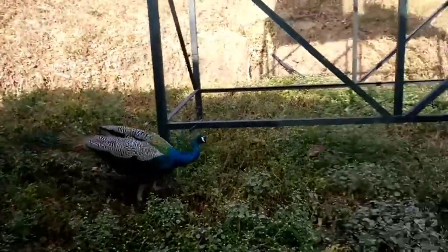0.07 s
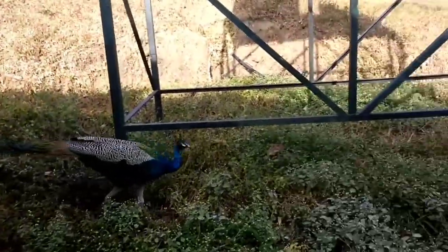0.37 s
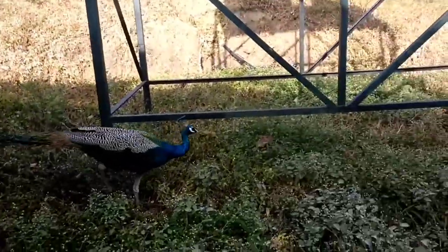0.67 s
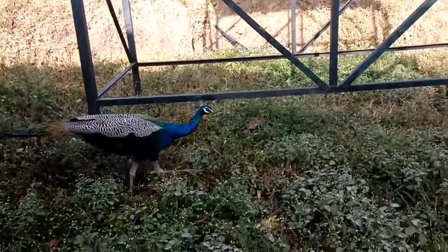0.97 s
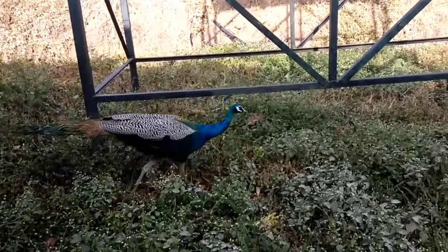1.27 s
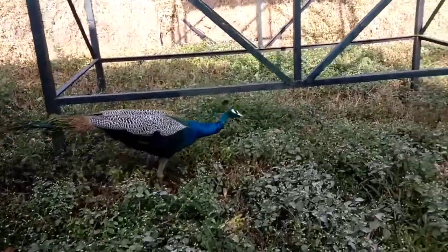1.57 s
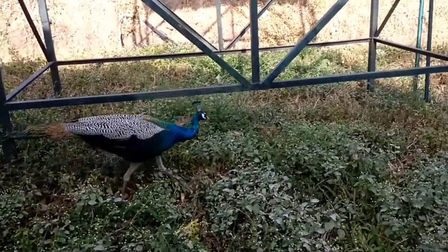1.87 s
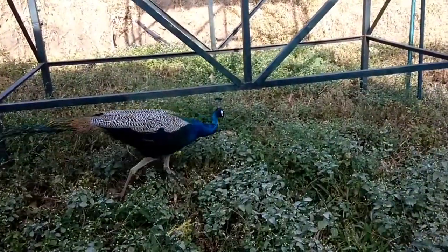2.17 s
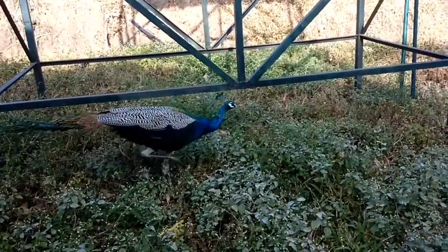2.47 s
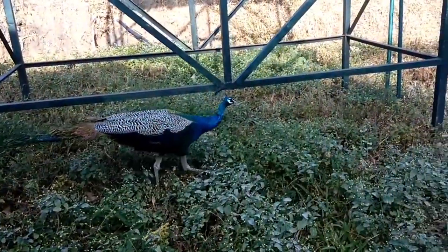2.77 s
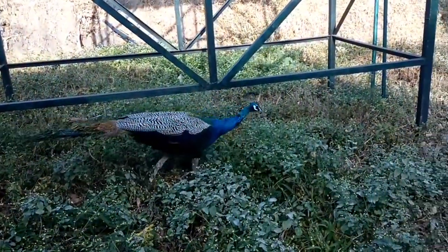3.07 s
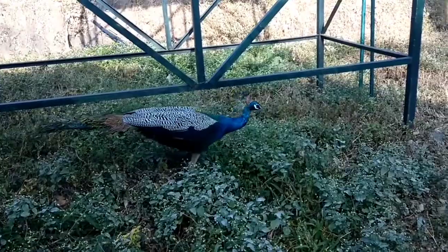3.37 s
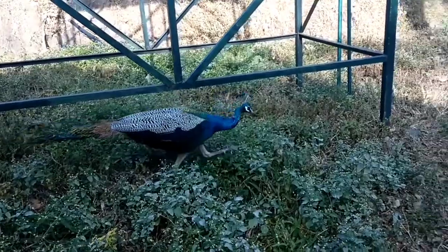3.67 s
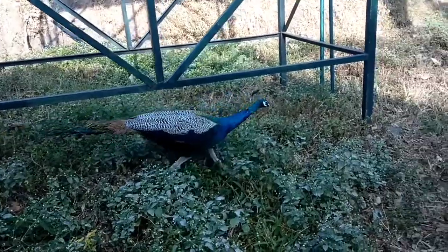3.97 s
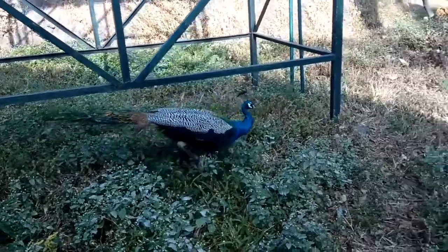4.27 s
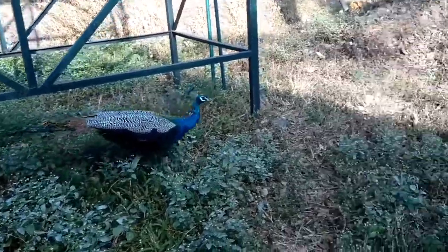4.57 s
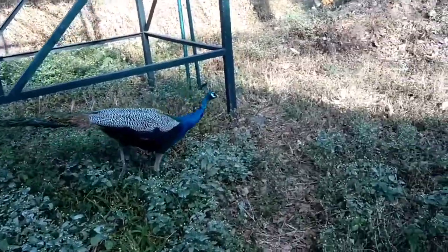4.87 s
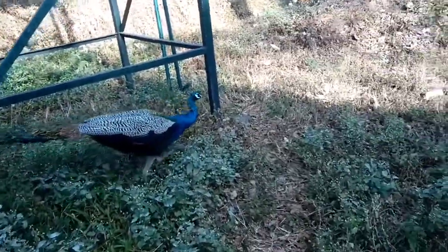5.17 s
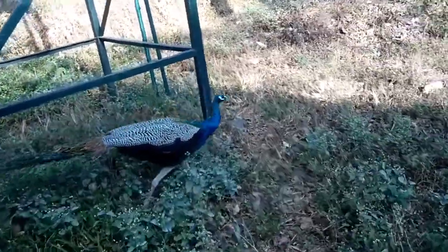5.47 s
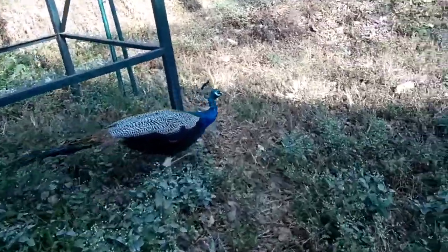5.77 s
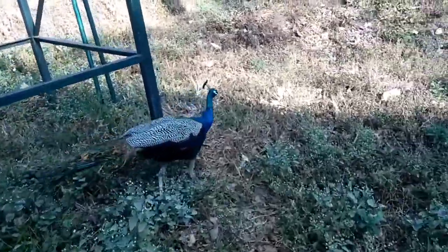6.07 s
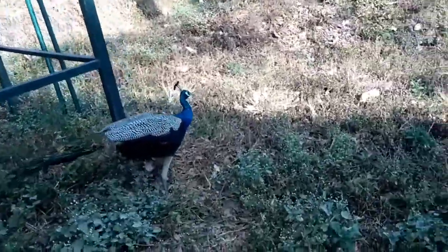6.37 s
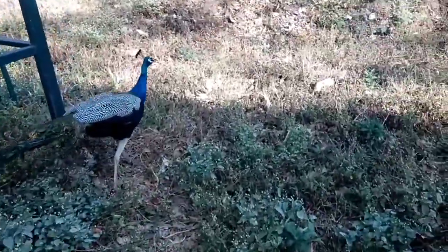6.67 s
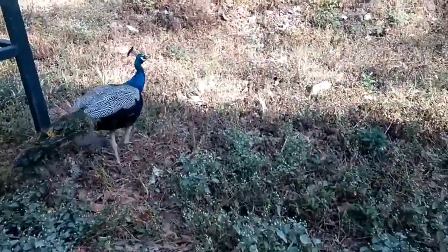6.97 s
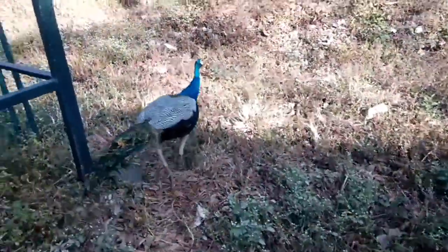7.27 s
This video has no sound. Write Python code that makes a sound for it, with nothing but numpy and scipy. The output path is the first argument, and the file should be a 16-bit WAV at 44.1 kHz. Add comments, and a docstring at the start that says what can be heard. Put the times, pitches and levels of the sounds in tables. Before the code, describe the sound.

A quiet outdoor background of distant rumble, faint hum and high insect hiss runs underneath. A soft low thump sounds right at the start, and far birds chip through the first second. From 1.2 to 2.5 seconds a small songbird sings a clear, high trill of nine quick syllables, echoing lightly among trees. Three faint, lower whistles come from the left between 1.6 and 2.9 seconds. Most of the background fades at 2.5 and snaps back at 2.8. The songbird swells into a buzz near 3.2 seconds, running straight into six slurred whistles that end around 4.4. A second soft thump comes at 4.8 amid more distant chips, and dry leaves crackle briefly around 5.5. The same trill returns from 5.9 to 7.1 seconds. The background fades again, then returns abruptly with one faint chip at about 7.5.

```python
"""Among trees, a small songbird sings a quick trill and a swelling buzz that runs into slurred whistles; then
the same stretch of trill plays again exactly. Its notes are gliding pure tones, its buzz a frequency-modulated
one; nearby surfaces reflect them and the trees scatter them. Fainter birds call over a distant rumble, a hum
and a hiss of insects; dry leaves crackle and two soft thumps sound. After each trill most of the background
fades away and comes back abruptly."""
import sys
import numpy as np
from scipy import signal
from scipy.fft import rfft, irfft, next_fast_len
from scipy.io import wavfile
from scipy.ndimage import uniform_filter1d, map_coordinates

SR = 44100
rng = np.random.default_rng(int(sys.argv[2]) if len(sys.argv) > 2 else 0)


def to_wav(s):
    """Save 16-bit WAV."""
    ch = np.atleast_2d(s).T  # columns
    pcm = np.round(np.clip(ch, -1, 1) * 32767)  # PCM
    wavfile.write(sys.argv[1], SR, pcm.astype(np.int16))


N = 332073
TIME = np.arange(N) / SR

# a short falling chip; every note shape is (length [s], pitches [Hz], attack [s], hold [s], drop [dB])
CHIP = dict(length_s=.0202, pitch_hz=[4550, 4370, 4123, 3900], attack_s=0.0048, hold_s=.0032, drop_db=10)


def trill(sweep_after_s=0.018, tail_after_s=0.0385, hook_growth=1.38):
    """Frequency glides in quick succession: each syllable is a hook, an upsweep, a tail and a pip."""
    # note shapes (length [s], pitches [Hz], attack [s], hold [s], drop [dB])
    hook = dict(length_s=0.019, pitch_hz=[3410, 3523, 3658, 3495, 2950],
            attack_s=0.012, hold_s=0.0035, drop_db=15.5)
    upsweep = dict(length_s=0.023, pitch_hz=[4120, 4326, 4524, 4770, 5514, 6000],
               attack_s=0.013, hold_s=0.0023, drop_db=25)
    sagging_tail = dict(length_s=0.0362, pitch_hz=[4460, 4170, 4070, 4001, 3984, 4110],
                    attack_s=0.0055, hold_s=0.0063, drop_db=11.5)
    high_pip = dict(length_s=0.014, pitch_hz=[7100, 7080, 7105, 6980, 6550],
                attack_s=0.0067, hold_s=0.0043, drop_db=10)
    # syllables (time [s], upsweep level [dB], pip level [dB])
    syllables = [(1.2363, -11.5, -20.5), (1.3746, -5, -19), (1.5162, -3.5, -18), (1.6551, -3, -21),
                 (1.796, -3, -22.5), (1.9385, -3, -18), (2.0807, -3.7, -18.5), (2.2243, -4.5, -24.5),
                 (2.3748, -6, -40)]
    s, db, pip_db = np.transpose(syllables)
    hooks = notes(hook, s, -5.5 + hook_growth * db)  # the hook gains most from effort
    sweeps = notes(upsweep, s + sweep_after_s, db)
    tails = notes(sagging_tail, s + tail_after_s, db - 2.5)
    period_s = np.append(np.diff(s), np.diff(s)[-1])
    pips = notes(high_pip, s + 0.675 * period_s, pip_db)
    return hooks + sweeps + tails + pips


def buzz(pitch_hz=4704, push_hz=93, flutter_hz=167.5, swing_hz=200):
    """Fast, uneven frequency and amplitude modulation roughens a tone that rises a little as it swells."""
    peak_s, swell_s, swell_db = 3.244, 0.34, 46.5
    stop_s, release_db_per_s = 3.342, 979
    effort_db = -swell_db * (np.minimum(TIME - peak_s, 0) / swell_s) ** 2
    db = -7.5 + effort_db - release_db_per_s * np.maximum(TIME - stop_s, 0)
    carrier_hz = pitch_hz + push_hz * amp(effort_db) ** 2
    flutter = oscillator(flutter_hz * (1 + 0.033 * wobble(120)))
    rasp_hz = 40 * wobble(250)
    tone = oscillator(carrier_hz + swing_hz * flutter + rasp_hz)
    return amp(db + 0.3 * wobble(150)) * (1 + 0.12 * flutter) * tone


def slurs(dive_after_s=0.0211):
    """Pitch and amplitude glide together: after a peep, a whistle dives, nearly vanishes and climbs."""
    # note shapes (length [s], pitches [Hz], attack [s], hold [s], drop [dB])
    peep = dict(length_s=0.016, pitch_hz=[5520, 5660, 5825, 6130],
            attack_s=0.011, hold_s=0.0023, drop_db=19)
    dive = dict(length_s=.0305, pitch_hz=[4190, 3573, 3323, 3187, 3020, 2780],
            attack_s=0.0035, hold_s=0.0046, drop_db=25)
    trough = dict(length_s=0.045, pitch_hz=[2800, 2616, 2422, 2500, 2960],
              attack_s=.0032, hold_s=0.037, drop_db=4.5)
    climb = dict(length_s=0.052, pitch_hz=[3103, 3546, 3855, 4086, 4706, 5089.4],
             attack_s=0.024, hold_s=0.019, drop_db=10)
    # syllables (time [s], climb time [s], peep level [dB], dive level [dB], climb level [dB],
    # dive pitch [ratio])
    syllables = [(3.404, 3.476, -17.5, -26, -7, 0.84), (3.556, 3.6513, -12.5, -9.5, -5, 0.99),
                 (3.737, 3.829, -11.5, -7, -6, 0.99), (3.9142, 4.007, -16, -9, -6.5, 1),
                 (4.097, 4.1887, -15, -8.5, -4.5, 1), (4.282, 4.372, -12, -8.5, -7.5, 0.99)]
    s, climb_s, peep_db, dive_db, climb_db, dive_ratio = np.transpose(syllables)
    dives = notes(dive, s + dive_after_s, dive_db, dive_ratio)
    troughs = notes(trough, climb_s - trough["length_s"], levels_db=-36)
    return notes(peep, s, peep_db) + dives + troughs + notes(climb, climb_s, climb_db)


def notes(shape, times, levels_db, ratios=1):
    """Superposition of one note shape sung at each time, level and pitch ratio."""
    out = np.zeros(N)
    for s, db, ratio in np.broadcast(times, levels_db, ratios):
        add(out, s, amp(db) * note(ratio=ratio, **shape))
    return out


def note(length_s, pitch_hz, attack_s, hold_s, drop_db, ratio):
    """An attack-hold-release envelope shapes a glide through pitches evenly spaced in time."""
    t = np.arange(0, length_s, 1 / SR)
    knots = np.linspace(0, length_s, len(pitch_hz))
    pitch_chance, level_chance = rng.standard_normal((2, len(knots)))
    pitch = ratio * np.interp(t, knots, pitch_hz * (1 + 0.005 * pitch_chance))
    attack = np.minimum(t / attack_s, 1) ** 0.86
    release = np.clip((t - attack_s - hold_s) / max(length_s - attack_s - hold_s, 1 / SR), 0, 1)
    dip_db = 4 * np.exp(-((pitch - 3955) / 92) ** 2)  # the note thins as it passes this pitch
    db = 0.81 * np.interp(t, knots, level_chance) - drop_db * release - dip_db
    return whistle(pitch, attack * amp(db))


def whistle(pitch, gain):
    """A pure tone; smoothed pitch and tapered ends keep its spectrum narrow."""
    taper = signal.windows.tukey(len(pitch), 120 / len(pitch))
    return taper * gain * oscillator(uniform_filter1d(pitch, size=90, mode="nearest"))


def echoes(x, wet_db, t60):
    """Convolution with the direct path, near reflections and a diffuse tail scattered by the trees."""
    # reflections from nearby surfaces (delay [ms], level [dB])
    reflections = [(3.1, -24), (9.6, -14), (12.6, -15.5), (18.4, -20), (21.2, -28.4)]
    t = np.arange(round(0.8 * SR)) / SR
    build_up = 1 - np.exp(-t / 0.014)
    tail = rng.standard_normal(len(t)) * amp(-60 * t / t60) * build_up
    response = amp(wet_db) * tail / np.linalg.norm(tail)
    response[0] = 1
    for ms, db in reflections:
        response[round(ms * SR / 1000)] += amp(db)
    return signal.fftconvolve(x, response)[:N]


def far_birds(chip_gap_s=0.031):
    """Distance weakens the direct sound of chips and whistles against their reverberation."""
    # double and single chips (time [s], level [dB])
    double_chips = [(-.006, -31), (0.387, -34.5), (0.572, -31.5), (0.817, -36), (1.059, -32.5)]
    lone_chips = [(2.828, -31), (7.447, -30.5)]
    # a rising note (length [s], pitches [Hz], attack [s], hold [s], drop [dB])
    upslur = dict(length_s=.12, pitch_hz=[1620, 1765, 1955, 2235, 2740, 3280],
              attack_s=0.035, hold_s=0.053, drop_db=18.5)
    # its calls (time [s], level [dB], pitch [ratio])
    upslur_calls = [(1.281, -45.5, 0.97), (1.585, -46, .935), (1.896, -46.5, .955), (2.174, -43.5, 0.95),
                    (2.413, -44.5, 0.95)]
    # a thin whistle (time [s], length [s], pitches [Hz], level [dB])
    thin_whistle = dict(start_s=.746, length_s=0.536, pitch_hz=[1970, 1947, 2026], level_db=-41)
    chip_s, chip_db = np.transpose(double_chips)
    passage = notes(CHIP, chip_s, chip_db) + notes(CHIP, chip_s + chip_gap_s, chip_db)
    passage += notes(upslur, *np.transpose(upslur_calls))
    passage += long_whistle(**thin_whistle, waver_hz=17)
    passage *= amp(-2 + 2.1 * wobble(45))  # moving air and leaves make far sounds flicker
    calls = twice(passage) + notes(CHIP, *np.transpose(lone_chips))
    return echoes(calls, wet_db=-6, t60=0.29)


def hoarse_birds():
    """Bursts of narrow-band noise have only a rough pitch: hoarse far calls and faint clucks."""
    # calls and clucks (time [s], half length [s], level [dB])
    calls = [(.06, .15, -51.5), (4.73, 0.16, -54.5)]
    clucks = [(1.546, 0.01, -42), (1.791, 0.01, -44), (2.079, 0.0055, -40.5), (2.401, 0.0088, -39)]
    call_gain = sum(amp(db) * swell(s, half) for s, half, db in calls)
    cluck_gain = sum(amp(db) * swell(s, half) for s, half, db in clucks)
    hoarse = call_gain * band(centre_hz=1710, width_hz=64)
    return hoarse + twice(cluck_gain * band(centre_hz=1010, width_hz=130))


def arched_whistles():
    """A level difference between the ears places a lower-voiced bird's three whistles on the left."""
    # whistles (time [s], length [s], start pitch [Hz], middle pitch [Hz], end pitch [Hz], level [dB])
    arches = [(1.63, .22, 1260, 1470, 1260, -51), (2.074, .36, 1338, 1363, 1295, -35.5),
              (2.67, 0.24, 1330, 1436, 1422, -38.5)]
    voice = sum(long_whistle(s, length, pitch, db) for s, length, *pitch, db in arches)
    return voice * amp([[3], [-8]])


def long_whistle(start_s, length_s, pitch_hz, level_db, waver_hz=0):
    """Slow modulation: a tone swells and fades as its pitch follows a parabola through three values."""
    progress = np.linspace(0, 1, round(length_s * SR), endpoint=False)
    parabola = np.polyfit([0, 0.5, 1], pitch_hz, 2)
    pitch = np.polyval(parabola, progress) + waver_hz * wobble(29)[:len(progress)]
    out = np.zeros(N)
    add(out, start_s, whistle(pitch, amp(level_db) * np.sin(np.pi * progress) ** 0.83))
    return out


def twitter(start_s=2.691, gap_s=0.021, count=6):
    """Random upward transposition puts each of a quick run of tiny chips on its own high pitch."""
    ratios = 1.42 * (1 + 0.05 * rng.standard_normal(count))
    chips = notes(CHIP, start_s + gap_s * np.arange(count), levels_db=-48.5, ratios=ratios)
    return echoes(chips, wet_db=-11, t60=0.15)


def leaves(low_hz=2500, high_hz=9000):
    """Dry leaves give way in bursts of impulsive noise that decay exponentially."""
    # cracks (time [s], level [dB], time to fall 60 dB [s])
    cracks = [(0.01, -47.5, .08), (4.27, -40, 0.12), (5.446, -36, 0.036), (5.508, -28, .04),
              (5.516, -37, 0.059), (5.536, -40, 0.21), (5.596, -34.5, 0.021)]
    envelope = sum(amp(db - 60 * np.abs(TIME - s) / t60) * (TIME >= s) for s, db, t60 in cracks)
    spikes = unit(rng.standard_normal((2, N)) ** 3)
    crackle = filtered(spikes, lambda hz: hz ** 2 / (hz ** 2 + low_hz ** 2) / (1 + (hz / high_hz) ** 2))
    return envelope * unit(crackle)


def thump(time_s=0.135, carrier_hz=110, half_length_s=0.0031):
    """A Gaussian pulse shorter than one cycle of its carrier makes a soft bump with no ring."""
    t = time_s - TIME
    return amp(-16) * np.exp(-(t / half_length_s) ** 2) * np.sin(2 * np.pi * carrier_hz * t)


def rumble_and_hum(mains_hz=120):
    """A continuous spectrum of distant rumble and one spectral line of mains hum, both wavering."""
    # rumble spectrum (frequency [Hz], relative density [dB])
    spectrum = [(20, -6), (60, -9), (150, -3.5), (380, -2.5), (600, -7.5), (1000, -16), (1800, -19),
                (2600, -23), (5000, -26), (8000, -34), (11000, -51.5)]
    rumble = amp(-38 + 0.66 * wobble(8.5)) * noise(spectrum)
    hum = amp(-47.5 + 0.71 * wobble(4)) * np.sin(2 * np.pi * mains_hz * TIME)
    return rumble + hum


def hiss(song, creep_db_per_s=0.8, lift_db=4):
    """Amplitude modulation of fine noise: it creeps up, and lifts with the envelope of the song."""
    # hiss spectrum (frequency [Hz], relative density [dB])
    spectrum = [(2000, -8.5), (5000, 0.5), (8500, -1.5), (10200, -5.5), (11500, -16.5), (14300, -20.5)]
    envelope = uniform_filter1d(np.abs(song), size=SR // 4)
    singing = np.sqrt(np.abs(envelope) / envelope.max())
    return amp(-54 + creep_db_per_s * TIME + lift_db * singing + 0.9 * wobble(36)) * noise(spectrum)


def insects():
    """Many voices add incoherently, so each of two choruses is a narrow band of noise."""
    # lulls in the higher chorus (time [s], half length [s], depth [dB])
    lulls = [(0.842, .17, 4.5), (3.731, 1, 2), (5.54, 0.2, 3)]
    low_chorus = amp(-49 + 0.8 * wobble(3) + 1.4 * wobble(35)) * band(centre_hz=4200, width_hz=320)
    lull_db = sum(depth * swell(s, half) for s, half, depth in lulls)
    high_chorus = amp(-49 - lull_db + 1.5 * wobble(28)) * band(centre_hz=6840, width_hz=630)
    return low_chorus + high_chorus


def still_air():
    """A steady noise floor: low rumble coherent at both ears, and air uncorrelated between them."""
    # spectra of the two parts (frequency [Hz], relative density [dB])
    shared_spectrum = [(15, 4.5), (40, -1.5), (80, -12), (200, -22), (600, -27.5), (1500, -34), (3500, -32),
                       (4350, -27), (5200, -46), (7000, -52.5), (14000, -61)]
    wide_spectrum = [(15, 8), (50, -5), (200, -19), (600, -18.5), (1500, -22.5), (3500, -20.5), (4350, -7),
                     (5200, -15), (7000, -16), (10000, -27.5), (14000, -35.5)]
    wide = np.array([noise(wide_spectrum), noise(wide_spectrum)])
    return amp(-43) * noise(shared_spectrum) + amp(-50) * wide


def fade():
    """A gain envelope that slides to silence and snaps back."""
    # fades (start [s], silence [s], return [s])
    fades = [(2.448, 2.66, 2.834), (7.143, 7.346, 7.451)]
    gain = np.ones(N)
    for start, silent, back in fades:
        slide = np.clip((silent - TIME) / (silent - start), 0, 1) ** 1.08
        gain *= np.where(TIME < back, slide, 1)
    return gain


def amp(db):
    """Decibels to amplitude ratio."""
    return 10 ** (np.asarray(db) / 20)


def unit(x):
    """Normalisation to rms 1."""
    return x / np.sqrt(np.mean(x ** 2) + 1e-20)


def oscillator(hz):
    """A sine whose phase is the integral of its frequency."""
    return np.sin(2 * np.pi * np.cumsum(hz) / SR)


def wobble(rate):
    """Smooth interpolation through random knots, rate of them a second."""
    return map_coordinates(rng.standard_normal(int(N * rate / SR) + 4), [TIME * rate])


def swell(s, half_length_s):
    """A flat-topped envelope of height 1 around time s."""
    return np.exp(-((TIME - s) / half_length_s) ** 4)


def filtered(x, response):
    """Linear filtering: the spectrum of x times a frequency response."""
    size = next_fast_len(N + SR // 2)
    return irfft(rfft(x, size) * response(np.fft.rfftfreq(size, 1 / SR)), size)[..., :N]


def noise(spectrum):
    """Noise of rms 1 coloured by (frequency [Hz], relative density [dB]) points."""
    knots_hz, db = np.transpose(spectrum)
    white = rng.standard_normal(N)
    return unit(filtered(white, lambda hz: amp(np.interp(np.log(hz + 1), np.log(knots_hz), db))))


def band(centre_hz, width_hz):
    """Noise of rms 1 in a Gaussian passband."""
    white = rng.standard_normal(N)
    return unit(filtered(white, lambda hz: np.exp(-((hz - centre_hz) / width_hz) ** 2 / 2)))


def add(track, s, sound):
    """Superpose a sound on the track from time s on."""
    start = round(s * SR)
    part = sound[max(-start, 0):max(N - start, 0)]
    track[max(start, 0):][:len(part)] += part


def twice(x, delay_s=4.6884):
    """A delayed copy brings the same passage round again."""
    return x + np.pad(x, (round(delay_s * SR), 0))[:N]


def scene():
    """Superposition: the centre fades twice; twitter, low whistles, leaves and still air do not."""
    song = echoes(twice(trill()) + slurs() + buzz(), wet_db=-14, t60=0.74)
    birds = song + far_birds() + hoarse_birds()
    background = twice(thump()) + rumble_and_hum() + hiss(song) + insects()
    centre = fade() * (birds + background)
    return centre + twitter() + arched_whistles() + leaves() + still_air()


def record(dry):
    """An ideal low-pass filter removes everything above 14.5 kHz."""
    return filtered(dry, lambda hz: hz < 14500)


dry = scene()
out = record(dry)
to_wav(out)
```